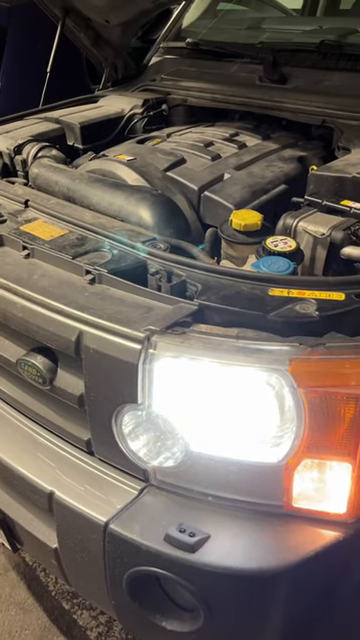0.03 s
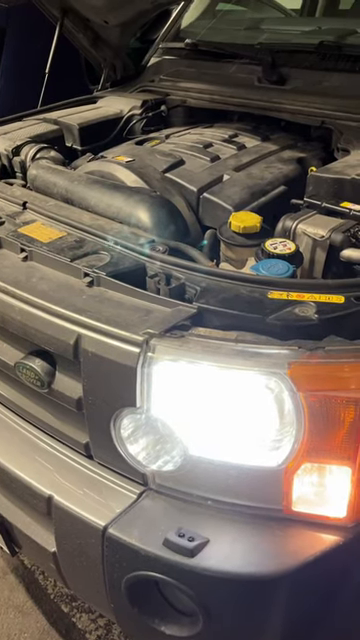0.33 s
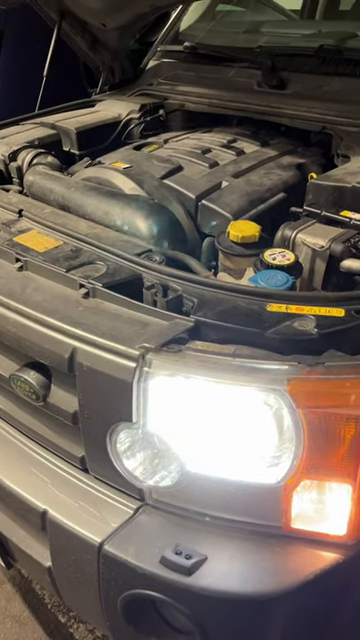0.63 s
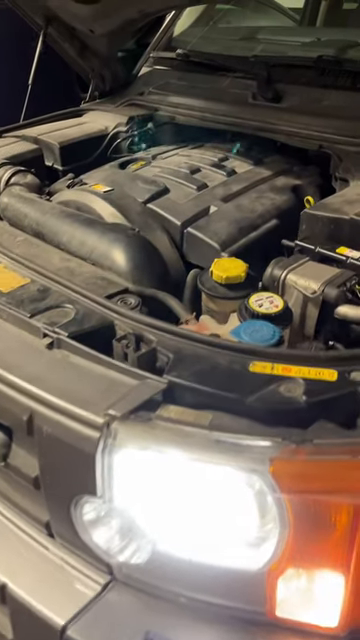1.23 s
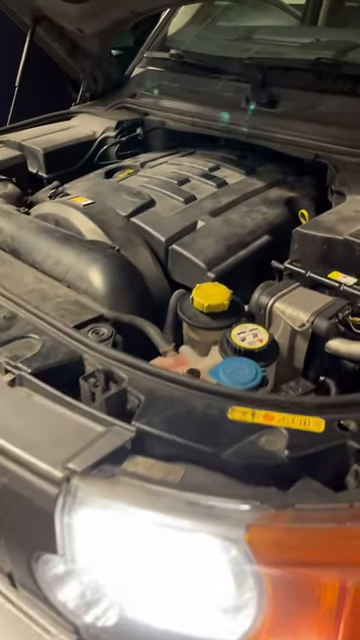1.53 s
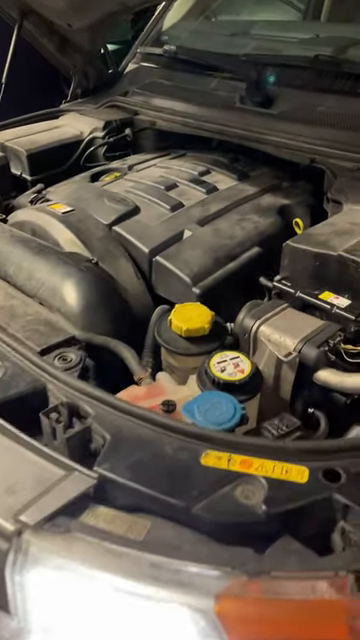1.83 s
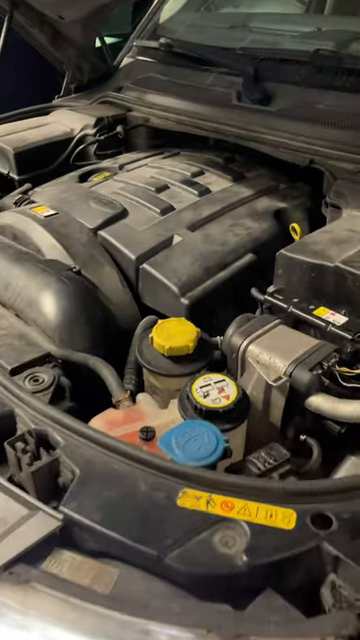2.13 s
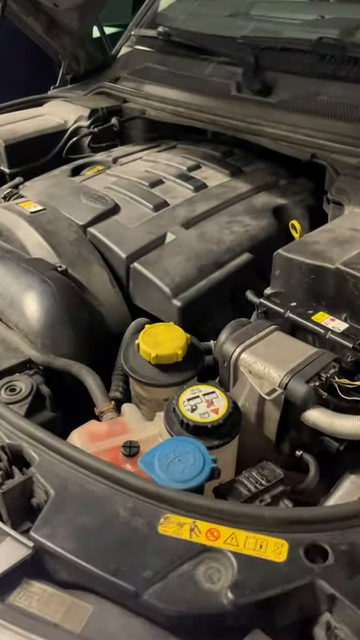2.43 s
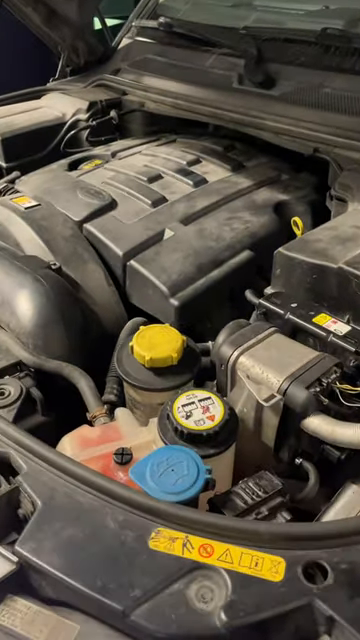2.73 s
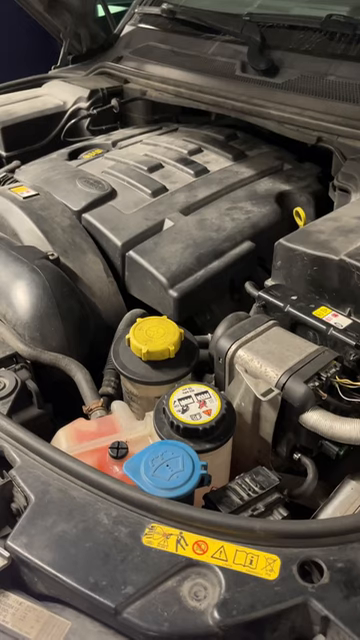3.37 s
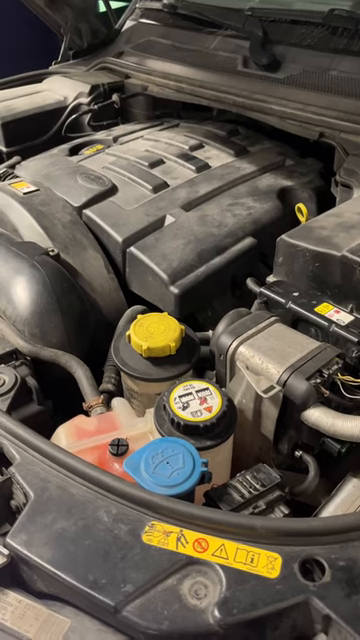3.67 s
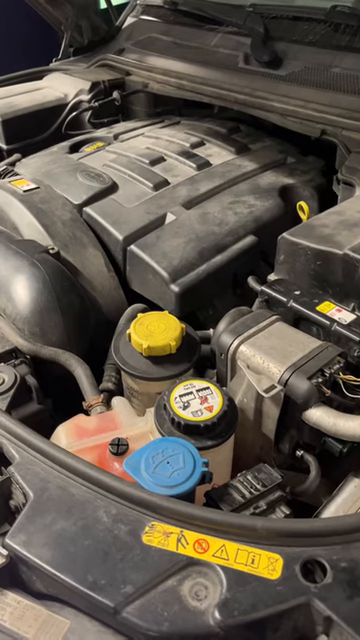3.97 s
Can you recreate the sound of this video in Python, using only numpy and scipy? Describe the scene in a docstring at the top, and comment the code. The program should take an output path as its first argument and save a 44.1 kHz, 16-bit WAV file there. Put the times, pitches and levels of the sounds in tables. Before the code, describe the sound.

A diesel car engine idles from the start with its hood open. Rapid knocks, injector ticks and rattling covers repeat over a lumpy low boom, with a light recurring rasp and a soft rush of belts and fan. Until about 2.7 seconds the sound grows slightly louder and brighter as the microphone moves in. It then stays close, idling at the same speed until the end, around 4 seconds.

```python
"""A six-cylinder diesel idles with its hood open. From the start, belts and fan rush behind a lumpy
boom from the uneven cylinders. Every firing thuds, knocks in the block, clatters and ticks at its
injector; covers rattle in turn, and a brighter rasp comes once a cycle. Over the first 2.7 seconds
a hand-held phone moves in over the engine, so the sound grows louder and brighter.
Then the phone stays close and the engine idles on to the end."""
import sys
import numpy as np
from scipy import signal
from scipy.fft import rfft, irfft
from scipy.io import wavfile
from scipy.ndimage import uniform_filter1d

SR = 44100
rng = np.random.default_rng(int(sys.argv[2]) if len(sys.argv) > 2 else 0)


def persist_wave(psi):
    """Save psi, clipped to +-1, as 16-bit WAV."""
    counts = np.round(np.clip(psi, -1, 1) * 32767).astype(np.int16)
    wavfile.write(sys.argv[1], SR, np.atleast_2d(counts).T)


N = 176400  # 4 seconds
CYLINDERS = 6  # each fires once in an engine cycle
FIRING_HZ, SLOWING_HZ_PER_S, START_FIRINGS = 39.6, .034, -.05


def gain(db):
    """Turn decibels into a number to multiply by."""
    return 10 ** (np.asarray(db) / 20)


def normalize(x):
    """Scale a sound to an average strength (rms) of 1."""
    return x / np.sqrt(np.mean(x ** 2))


def at_each_pitch(points):
    """Read a table of pitch_hz, value at every pitch in the spectrum."""
    hz, value = np.array(points, float).T
    return np.interp(np.log(np.maximum(np.fft.rfftfreq(N, 1 / SR), 1)), np.log(hz), value)


def colour(x, tone):
    """Turn pitches up or down by a table of pitch_hz, level_db."""
    return irfft(rfft(x) * gain(at_each_pitch(tone)), N)


def shape_tone(x, tone, even_hz):
    """Even out chance peaks over a band even_hz wide, then colour and normalize the sound."""
    spectrum = rfft(x)
    power = uniform_filter1d(np.abs(spectrum) ** 2, max(int(even_hz * N / SR), 1), axis=1)
    flat = irfft(spectrum / np.sqrt(np.abs(power) + 1e-12), N)
    return normalize(colour(flat, tone))


def drift(rate_hz):
    """A smooth random wander, roughly between -1 and 1."""
    hold = int(SR / rate_hz)
    steps = rng.standard_normal(256)[np.arange(N) // hold]
    return 1.3 * uniform_filter1d(uniform_filter1d(steps, hold), hold)


def firing_count():
    """How many firings have gone by; the idle slows very slightly."""
    t = np.arange(N) / SR
    return START_FIRINGS + FIRING_HZ * t - SLOWING_HZ_PER_S * t ** 2 / 2


def cycle_times(place):
    """The times in seconds when each cycle reaches a place, counted in firings from 0 to 6."""
    steady_s = (np.arange(-1, 28) * CYLINDERS + place - START_FIRINGS) / FIRING_HZ
    return steady_s + SLOWING_HZ_PER_S * steady_s ** 2 / (2 * FIRING_HZ)


# How the level rises as the phone moves in: time_s, level_db
APPROACH = [(0, -3), (1, -2.5), (2, -0.53), (2.7, 0.5), (4, 0.5)]

def nearness(follow):
    """Gain as the phone moves in; follow multiplies the decibels, so a negative one fades a sound."""
    return gain(follow * np.interp(np.arange(N) / SR, *np.array(APPROACH).T))


# The notes at which the block and covers ring: pitch_hz, level_db
METAL_NOTES = [(327, 1), (578, 1.5), (640, 2), (868, -2.5), (1141, 7.5), (1543, -3.5), (1871, 7), (2611, 9),
               (3754, 7.5), (4150, 0.5), (4457, 1), (4963, 5)]

def metal_ring(fade_s):
    """Struck metal: a noisy ring that dies by 60 dB in fade_s, plus a few clear notes."""
    t = np.arange(6000) / SR
    build_up = 1 - np.exp(-t / (.025 * fade_s))
    noisy = rng.standard_normal((2, len(t))) * gain(-60 * t / fade_s) * build_up
    notes = sum(gain(db) * np.sin(2 * np.pi * (hz * t + rng.random((2, 1)))) for hz, db in METAL_NOTES)
    ring = noisy + gain(-27) * notes * gain(-60 * t / .077)
    return ring / np.sqrt(np.sum(ring ** 2, axis=1, keepdims=True))


def hits(place, late_s, spread_s, jitter_s, jitter_db, fade_s, count):
    """A burst of small hits rings the metal at the same place in every cycle, never quite alike."""
    start_s = cycle_times(place) + late_s
    chance = rng.standard_normal((len(start_s), 2, count))
    progress = (np.arange(count) + rng.random(count) / 2) / count
    hit_s = start_s[:, None] + spread_s * progress + jitter_s * chance[:, 0]
    push_pull = (-1.) ** np.arange(count)
    strength = gain(jitter_db * chance[:, 1]) * (1 - progress / 2) * push_pull
    at = (hit_s * SR).astype(int)
    heard = (at >= 0) & (at < N)
    clicks = np.bincount(at[heard], strength[heard], N)
    return signal.oaconvolve(clicks[None], metal_ring(fade_s), axes=1)[:, :N]


# The tone of the rushing air: pitch_hz, level_db
AIR_TONE = [(20, -22), (60, 4.5), (130, 5.5), (300, -7), (600, 1.5), (1200, -5.5), (2500, -11.5),
            (4500, -13), (7500, -27), (15000, -38)]

def air_rush():
    """Belts, fan and intake air make a hiss that swells a little with every firing."""
    air = normalize(colour(rng.standard_normal((2, N)), AIR_TONE))
    swell_db = -np.cos(2 * np.pi * (firing_count() - .89))
    return air * gain(-31.5 + swell_db + drift(6.8)) * nearness(.98)


# The tones of bright ticks and of valve clatter, also used further down: pitch_hz, level_db
TICK_TONE = [(3000, -1), (6000, -0.5), (8200, 4), (9500, 0.5), (10800, -10.5), (11600, 4.5), (12800, -3),
             (15000, -7)]
CLATTER_TONE = [(1500, 1), (2500, 0.5), (3400, -13.5), (3900, 5), (4150, 2), (4600, .5), (5300, -9.5),
                (6300, -7.5), (7300, -15.5), (12000, -24)]

def valve_clicks():
    """The valve gear gives off dry stray clicks, thickest just after each firing."""
    chance, size = rng.random(N), rng.exponential(1, N)
    clicks_per_s = 260 * (1 + np.cos(2 * np.pi * (firing_count() - .4)))
    clicks = (chance < clicks_per_s / SR) * gain(3.2 * np.minimum(size, 4))
    ringing = signal.oaconvolve(clicks[None], metal_ring(fade_s=.007), axes=1)[:, :N]
    bright = gain(-52) * shape_tone(ringing, TICK_TONE, even_hz=400)
    duller = gain(-51.5) * shape_tone(ringing, CLATTER_TONE, even_hz=400)
    return (bright + duller) * nearness(1.7)


def rasp():
    """A bright, uneven scrape and its bounce once a cycle, perhaps from the fuel pump."""
    scrape = hits(0, -.001, spread_s=.015, jitter_s=.0012, jitter_db=4.5, fade_s=.013, count=8)
    bounce = hits(0, .015, spread_s=.0055, jitter_s=.0015, jitter_db=2.5, fade_s=.09, count=3)
    return gain(-51) * shape_tone(scrape + gain(-5) * bounce, TICK_TONE, even_hz=200) * nearness(1)


# Loose covers and pipes: peak_place_firings, pitch_hz, swell_s, level_db, nearness_factor
LOOSE_PARTS = [(.55, 860, 0.0031, -32.5, 0.5), (.65, 1300, 0.0031, -32, 4.5),
               (1.5, 650, 0.0021, -34.5, 3.5), (2.3, 174, 0.0069, -33, 3.5), (2.5, 298, 0.0056, -35, -2),
               (2.5, 4150, 0.0062, -40, 1.5), (2.6, 826, 0.0025, -29, 14.5), (2.95, 370, .005, -36, -2),
               (3.3, 253, 0.0058, -33.5, 1), (3.7, 615, 0.0076, -32.5, 0.8), (4.0, 368, 0.0069, -39, -1.8),
               (4.5, 3800, 0.0034, -34, 2.5), (4.9, 538, 0.003, -28, 3), (4.95, 204, 0.0074, -37, -2.5),
               (5.5, 4000, 0.0054, -41.5, -1.8), (5.55, 746, 0.0028, -29, 1)]

def rattles():
    """Each loose part rings briefly once a cycle, with tiny changes in timing and pitch."""
    out, t = np.zeros((2, N)), np.arange(4000) / SR
    for place, hz, swell_s, db, follow in LOOSE_PARTS:
        starts = cycle_times(place) - swell_s
        part, phase = np.zeros((2, N)), rng.random((2, 1))
        envelope = t / swell_s * np.exp(1 - t / swell_s)
        for start_s in starts:
            late_s, detune = rng.normal(0, .00012), rng.normal(0, .01)
            at = int((start_s + late_s) * SR) + np.arange(len(t))
            heard = (at >= 0) & (at < N)
            ring = envelope * np.sin(2 * np.pi * (hz * (1 + detune) * (t - swell_s) + phase))
            part[:, at[heard]] += gain(db) * ring[:, heard]
        out += part * nearness(follow)
    return out * gain(.5)


# The low tones that make up the boom: waves_per_cycle, level_db
BOOM_TONES = [(4, -57), (5, -43), (6, -35.5), (7, -34.5), (9, -40), (10, -36.5), (11, -35.5), (12, -40),
              (13, -40), (14, -35.5), (16, -36), (17, -47.5), (19, -45.5), (20, -39), (21, -44.5),
              (22, -49.5), (24, -51.5), (25, -45.5), (26, -50), (27, -41), (28, -45), (30, -46.5)]
# When each pitch of the boom arrives: pitch_hz, delay_s
BOOM_DELAYS = [(43, .021), (53, .031), (82, .134), (100, .141), (115, .193)]

def boom():
    """Uneven cylinders make low tones; higher ones arrive later, so each cycle sweeps upward."""
    cycles, cycle_hz, out = firing_count() / CYLINDERS, FIRING_HZ / CYLINDERS, 0
    for waves, db in BOOM_TONES:
        passed_hz = (np.arange(CYLINDERS, waves) + .5) * cycle_hz
        lag_turns = cycle_hz * np.sum(np.interp(passed_hz, *np.array(BOOM_DELAYS).T))
        out += gain(db + .3 * drift(4.8)) * np.cos(2 * np.pi * (waves * cycles - lag_turns))
    return out * nearness(.84)


# The tones of the deep thud and of the hard knock: pitch_hz, level_db
THUD_TONE = [(80, -35), (120, -17), (165, -1), (210, 1), (260, 1), (330, 1.5), (420, -2), (520, -6),
             (700, -16), (1200, -40)]
KNOCK_TONE = [(200, -13.5), (420, -9), (520, -2.5), (620, 1), (730, -4.5), (860, -2), (1050, -1),
              (1300, -4.5), (1550, -1), (1850, -7.5), (2300, -10), (3200, -9.5), (5000, -41), (9000, -43)]
# How each cylinder fires, one row each: late_s, thud_db, knock_db, tick_db
CYLINDER_HITS = [(.003, -7, -1.5, 4), (0, -3.5, 3.5, -7.5), (-.001, 0, 4.5, 2.5), (.001, -2, 2.5, 3),
                 (.002, -2, 0.5, 2), (.001, -2.5, 3.5, 1.5)]

def firings():
    """Each cylinder thuds, knocks, sets the valve gear clattering and ticks at its injector."""
    thud = knock = clatter = tick = 0
    for place, (late_s, thud_db, knock_db, tick_db) in enumerate(CYLINDER_HITS):
        thud += gain(thud_db) * hits(
            place, .005 + late_s, spread_s=.022, jitter_s=.00033, jitter_db=.5, fade_s=.17, count=3)
        knock += gain(knock_db) * hits(
            place, .009 + late_s, spread_s=.009, jitter_s=.00018, jitter_db=1.5, fade_s=.059, count=3)
        clatter += gain(knock_db / 2) * hits(
            place, .007, spread_s=.010, jitter_s=.0005, jitter_db=3.5, fade_s=.049, count=5)
        tick += gain(tick_db) * hits(
            place, .005, spread_s=.011, jitter_s=.0008, jitter_db=4.5, fade_s=.087, count=6)
    return (gain(-35.5) * shape_tone(thud, THUD_TONE, even_hz=24) * nearness(.052)
            + gain(-36) * shape_tone(knock, KNOCK_TONE, even_hz=267) * nearness(.82)
            + gain(-36) * normalize(colour(clatter, CLATTER_TONE)) * nearness(1.25)
            + gain(-44.5) * shape_tone(tick, TICK_TONE, even_hz=900) * nearness(1.46))


# How alike left and right sound: pitch_hz, likeness_0_to_1
MIC_LIKENESS = [(80, .998), (300, .96), (800, .89), (1400, .77), (1900, .8), (2500, .6), (5000, .65),
                (6000, .9), (15000, .93)]
# How far the left wave runs ahead of the right: pitch_hz, lead_radians
LEFT_LEAD = [(80, -0.0), (400, -0.5), (1200, -0.5), (2000, 0.6), (2700, 2.6), (3800, 1.0), (5000, 1.3),
             (5900, 3.1), (8000, 6.3), (10200, 9.4), (12400, 12.6), (14700, 15.7)]

def microphones(sound):
    """The phone's two microphones hear the same bass, but the treble is less alike and out of step."""
    shared, apart = rfft(sound)  # row 0 is common to both sides, row 1 sets them apart
    alike = np.clip(at_each_pitch(MIC_LIKENESS), 0, 1)
    shared, apart = shared * np.sqrt((1 + alike) / 2), apart * np.sqrt((1 - alike) / 2)
    shift = np.exp(1j * at_each_pitch(LEFT_LEAD) / 2)
    return irfft(np.array([(shared + apart) * shift, (shared - apart) / shift]), N)


def scene():
    """The whole engine as heard at the phone, a touch louder on the right."""
    engine = microphones(firings() + rattles() + rasp() + valve_clicks() + air_rush()) + boom()
    return engine * gain([[-.12], [.12]])


def record(dry):
    """The phone cuts off the highest treble, above 15800 Hz."""
    return signal.sosfilt(signal.ellip(10, .2, 80, 15800, fs=SR, output="sos"), dry)


dry = scene()
out = record(dry)
persist_wave(out)
```